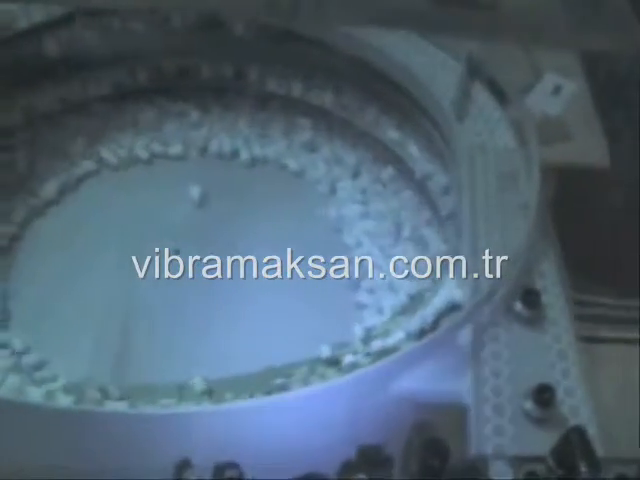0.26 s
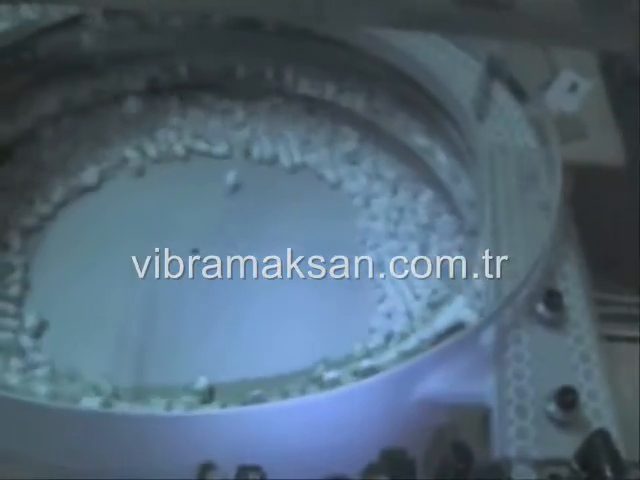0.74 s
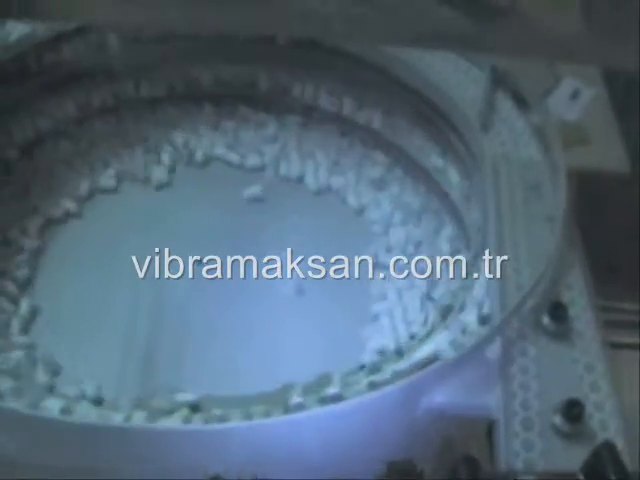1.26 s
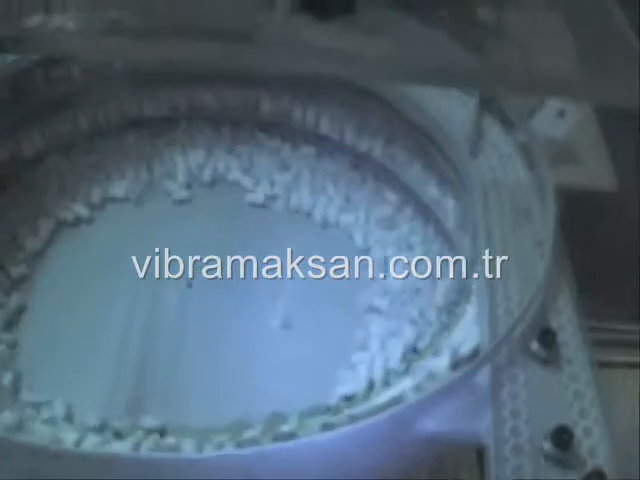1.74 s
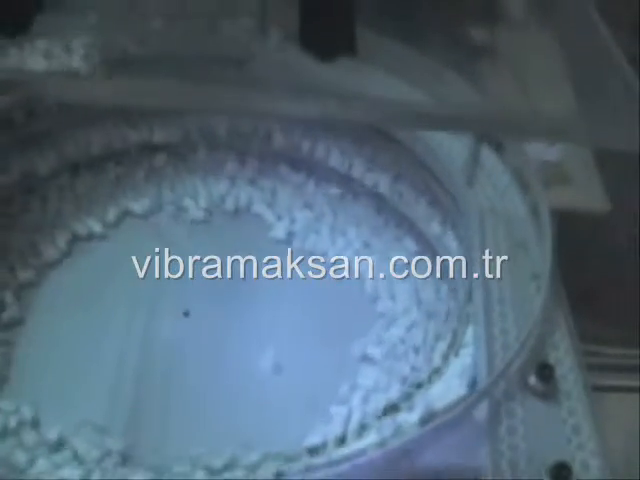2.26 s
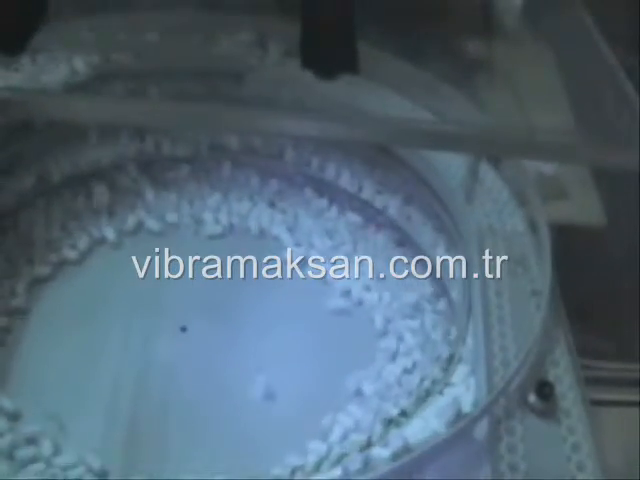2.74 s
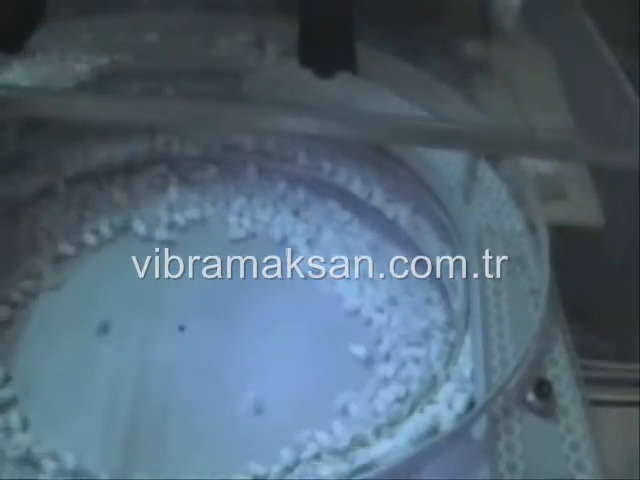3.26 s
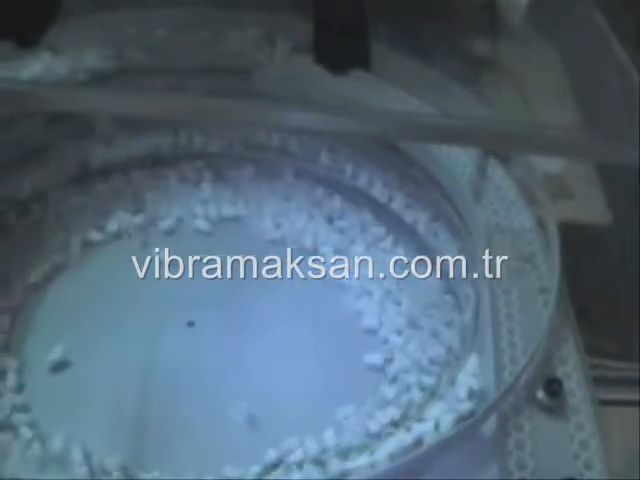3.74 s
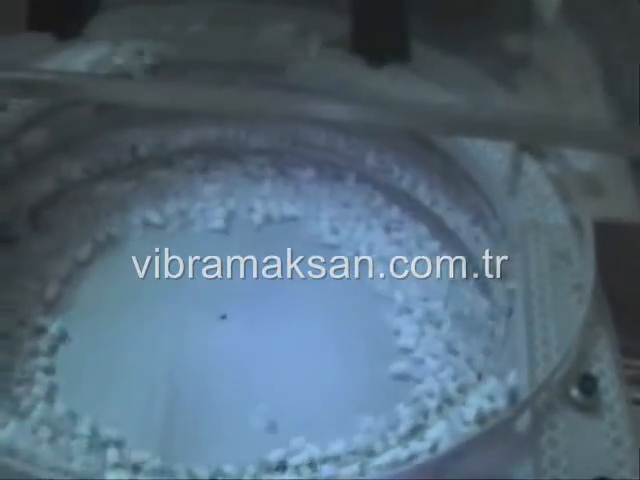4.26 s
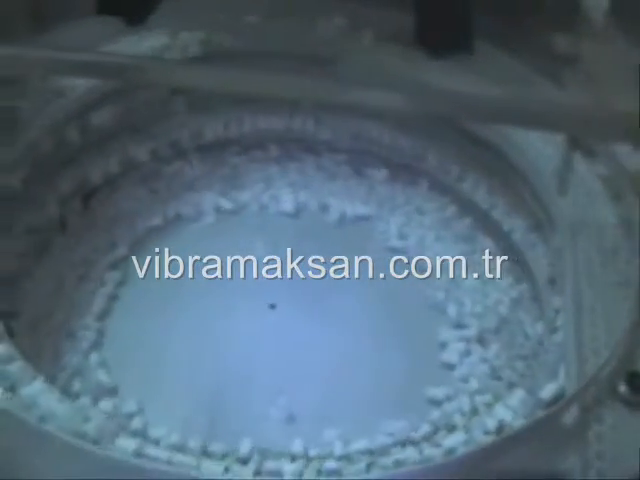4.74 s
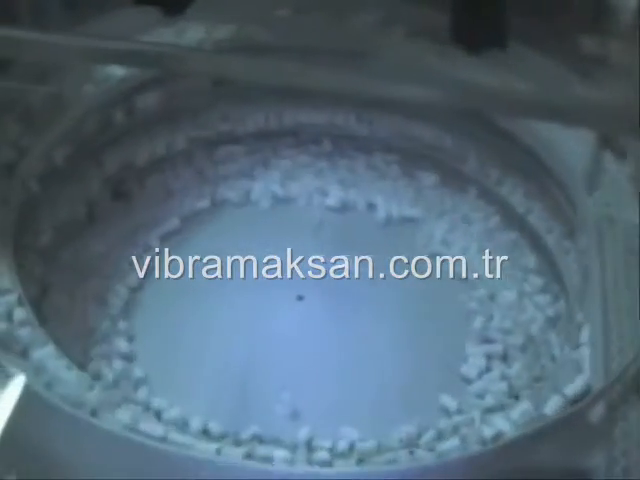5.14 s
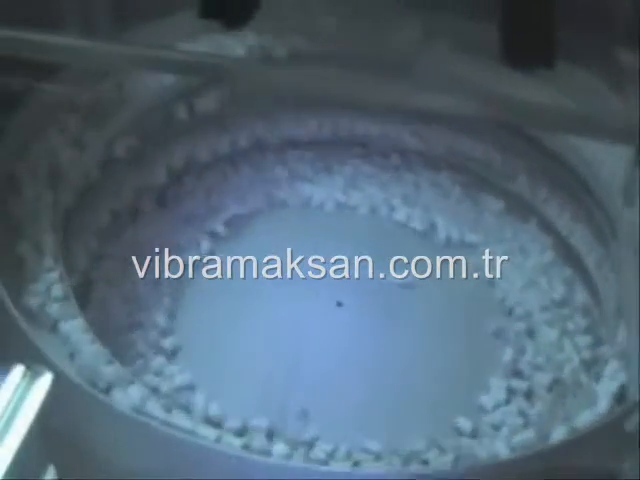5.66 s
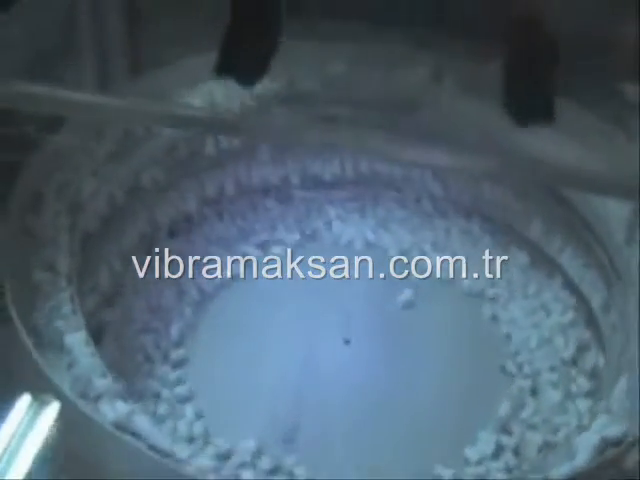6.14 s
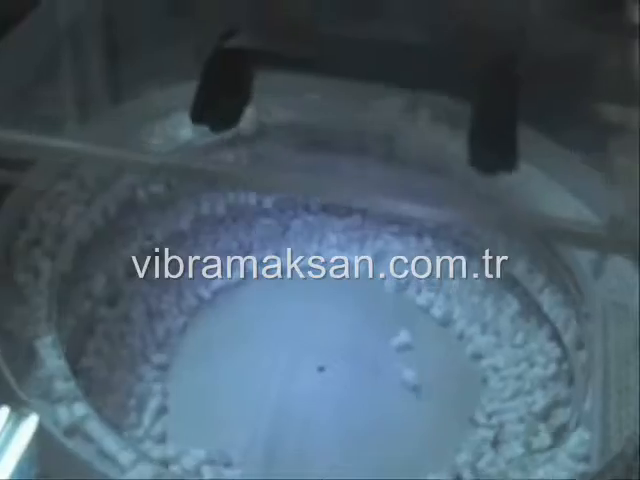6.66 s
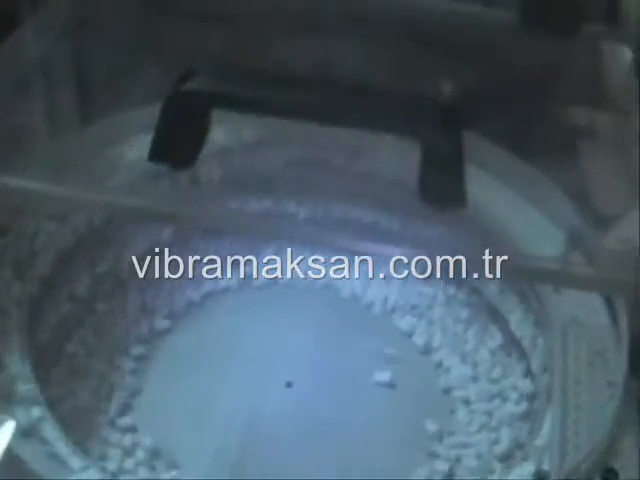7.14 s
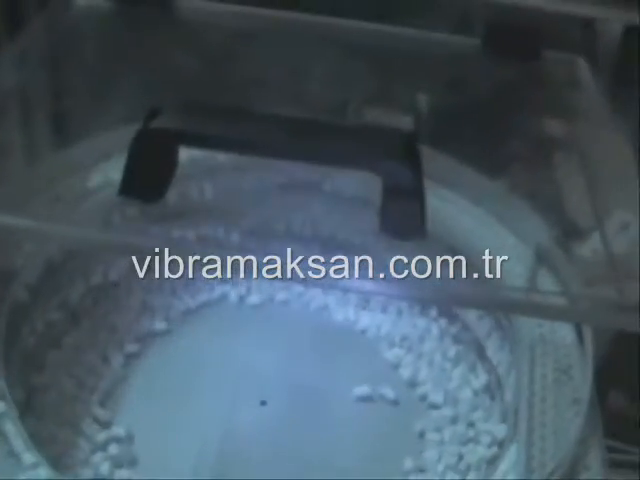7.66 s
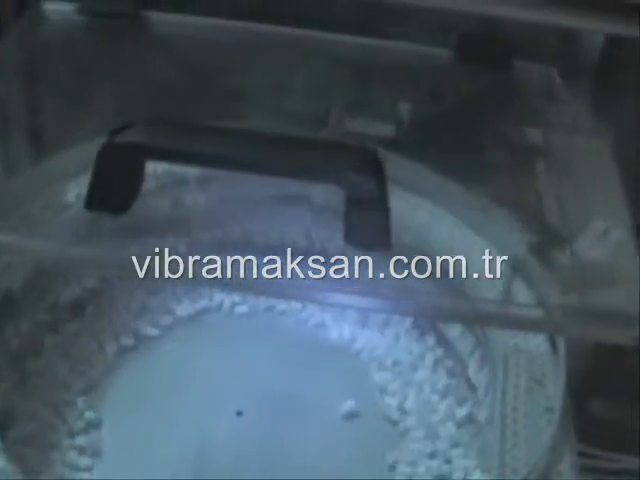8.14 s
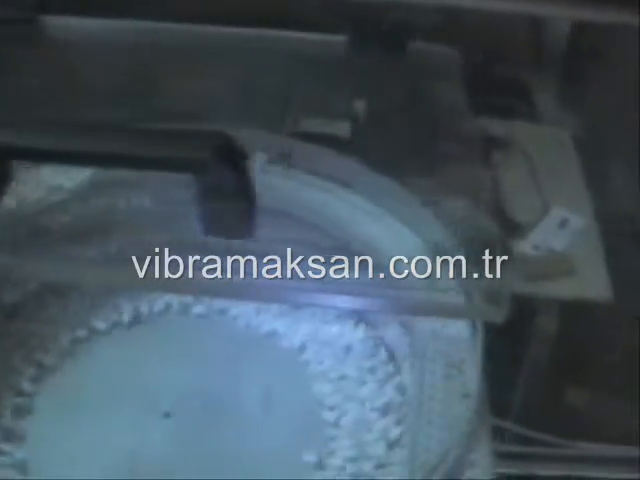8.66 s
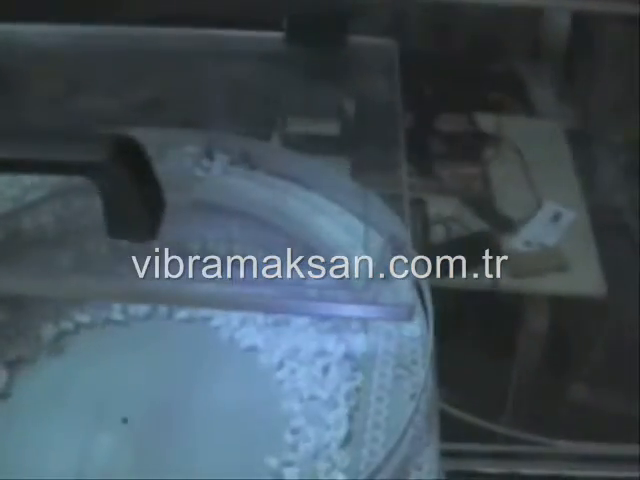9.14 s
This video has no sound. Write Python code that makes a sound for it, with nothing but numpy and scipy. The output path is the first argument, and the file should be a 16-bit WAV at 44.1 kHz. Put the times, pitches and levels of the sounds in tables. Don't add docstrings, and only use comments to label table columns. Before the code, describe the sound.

Close, continuous mains-like buzzing and a harsh, grainy rattle of tiny plastic parts in a metal feeder bowl, with a faint motor humming behind.

```python
import sys
import numpy as np
from scipy import signal
from scipy.fft import rfft, irfft, next_fast_len
from scipy.io import wavfile
from scipy.ndimage import uniform_filter1d, map_coordinates

SR = 44100
rng = np.random.default_rng(int(sys.argv[2]) if len(sys.argv) > 2 else 0)


def undo_db(level):
    steps = np.asarray(level, float) / 20
    return 10 ** steps


def bounce(signal):
    frames = np.transpose(np.atleast_2d(signal))
    limited = np.clip(frames, -1, 1)
    pcm = np.round(limited * 32767).astype(np.int16)
    wavfile.write(sys.argv[1], SR, pcm)


N = 414540

MAINS_HZ = 50.006
TRAVEL_S = .00648
TOP_HZ = 12410
TURN_S, TURN_TAKES_S = 9, .4

# (level [dB], drift while backing away [dB])
BUZZ_LINES = [(-46.5, 1.5), (-42.5, 0), (-42.5, -0.5), (-43.5, 1), (-32.5, -1.5), (-31.5, -3.5),
              (-31, -3.5), (-36, -4), (-25, -0.5), (-35.5, -3), (-42, -2), (-25, -1.5), (-48, -3),
              (-35.5, 1), (-40, -6), (-48, -6), (-41, -2), (-57, 3), (-42.5, 2), (-49.5, -10), (-44, 0),
              (-55, -3)]
# (frequency [Hz], width [Hz], turn [rad])
SPRING_MODES = [(413.4, 80, 5.84), (642, 8.5, -.86), (899, 56, 3.47)]
SWING_CHANGE = {6: -2.4, 8: -1.7, 12: 3, 13: -3.3, 14: 10, 16: 3}
# (frequency [Hz], level of each line [dB])
PLATE_COLOUR = [(1150, -51), (1450, -46.5), (1600, -56), (1800, -49), (2100, -47), (2300, -55.5),
                (4500, -57), (7000, -56)]
# (frequency [Hz], density [dB per Hz])
KNOCK_COLOUR = [(30, -22), (52, -21), (75, -21), (125, -20), (200, -11), (300, -8), (430, -4), (550, 3),
                (650, -4.5), (950, -6.5), (1400, -3), (2930, -2.5), (6100, -2.5), (10200, -6.5),
                (11500, -9.5), (12400, -19.5)]
# (frequency [Hz], width [Hz], level over the knocks [dB])
BOWL_MODES = [(135, 6, -5), (187, 7.4, 1), (560, 7.4, 4), (550, 15, 0.5), (593, 24, 3), (826, 19, 8),
              (1080, 32, 5), (1160, 35, 4.5), (1452, 20, 3), (1670, 50, 2), (1800, 15, 2), (1993, 30, 2.5),
              (2173, 40, 3.5), (2372, 17, 5.5), (2616, 52, 3.5), (2900, 320, -1), (3350, 18, -11),
              (3600, 50, 1.5), (3920, 60, -6.5), (4340, 61, 2), (4870, 360, 1.5), (6100, 460, 2.5),
              (7300, 350, 2), (8860, 100, 3.5), (9900, 270, 1)]
# (from [Hz], to [Hz], rate [hits/s], size scatter [dB], throw [0-1],
# scatter t60 [s], flicker [dB], beaming out of the bowl [ratio])
COLLISIONS = [(0, 2180, 5500, 2.7, 0.025, 0.12, 0.13, 0.11),
              (1890, 4200, 10000, 3.1, 0.063, 0.05, 0.17, .05),
              (3740, 7940, 4400, 1.2, 0.28, 0.051, 0.25, 0.15),
              (7620, 14000, 3000, 1.65, .25, 0.068, 0.21, 1.27)]
# (time [s], crowd [dB], facing [dB])
CROWD_FACING = [(0, 1.5, -1.5), (.3, -0.1, 1.5), (.48, -0.5, 0), (.64, 1, -1), (1.1, .5, -0.2),
                (2.3, .5, 0.7), (2.6, 0.1, 0.5), (3.35, 1, 1), (3.58, -1, 2.5), (4.12, 1.3, 0.5),
                (4.6, 0, 1.7), (5.4, 0.5, 0), (5.65, -0.5, 1.8), (6.2, -0.6, 1.5), (7.45, 0, 1.6),
                (7.85, -1.2, 0.5), (8.5, -1, 1), (9.4, 0.4, -1)]
# (time [s], peak [dB], left minus right [dB])
PART_DROPS = [(0.8384, -11, -1.5), (0.9824, -12, -1.5), (1.0254, -13, -1.0), (1.6094, -14, -1.0),
              (1.7659, -8, -0.5), (2.2657, -8, -1.5), (2.5034, -13, -0.5), (2.5626, -12, -1.0),
              (3.2271, -12, -1.0), (3.4735, -10, -1.0), (3.8034, -10, -1.0), (3.9164, -12, -1.0),
              (4.3194, -13, -1.0), (4.7571, -10, -1.5), (5.6286, -11, -2.5), (6.9197, -8, -1.5),
              (7.0918, -10, -2.0), (7.6316, -12, -2.5), (9.2234, -16, -1.0)]
# (frequency [Hz], level [dB], waver [Hz])
MOTOR_LINES = [(98.26, -55, .003), (228.43, -38.3, .03), (456.86, -50, .1), (685.3, -45, .3),
               (865.6, -43, .4), (913.7, -52, .3)]
# (from [s], to [s], frequency [Hz], width [Hz], level [dB])
STANDING_WAVES = [(1.5, 5.5, 1700, 140, 3), (4.5, 11, 1420, 200, 3), (-1, 7.6, 1230, 110, -1),
                  (7.5, 9.6, 910, 190, -4), (4, 4.8, 8800, 500, 1.5), (10, 9.6, 9900, 300, 3),
                  (8, 9.1, 6500, 400, 4), (.55, 1.2, 4300, 140, 4.5), (9, 8.7, 2600, 900, 2),
                  (8.7, 9.6, 2700, 400, -1.5)]
# (frequency [Hz], side minus mid [dB])
SIDE_LEVEL = [(60, -2), (110, -5), (190, -12.5), (350, -13.5), (630, -12.5), (1140, -14), (2060, -12),
              (3710, -10), (6680, -11.5), (12000, -4.5)]
# (frequency [Hz], left minus right [dB])
PORT_TILT = [(190, 0.0), (350, 0.5), (630, 0.5), (1140, 0.0), (6680, 0.0), (12000, -2.0)]


def curve(table, hz):
    f, db = np.transpose(table)
    return np.interp(np.log(hz + 1), np.log(f), db)


def shape(x, gain):
    size = next_fast_len(N)
    hz = np.arange(size // 2 + 1) * SR / size
    return irfft(rfft(x, size) * gain(hz), size)[..., :N]


def unit(x):
    return x / np.sqrt(np.mean(x ** 2))


def walk(rate):
    hold, size = int(SR / rate), 32
    held = np.repeat(rng.standard_normal(N // hold + 1), size)
    slewed = uniform_filter1d(uniform_filter1d(held, size), size)
    return unit(np.interp(np.arange(N) * size / hold, np.arange(len(held)), slewed))


def tail(t60):
    fade = np.exp(-2 * np.log(1000) * np.arange(int(t60 * SR)) / SR / t60)
    return fade / fade.sum()


def over_time(table):
    s, *columns = np.transpose(table)
    return [np.interp(np.arange(N) / SR, s, column) for column in columns]


def buzz(t, waver_db=0.56):
    turned = np.clip((t - TURN_S) / TURN_TAKES_S + .5, 0, 1)
    out = 0
    for k, (db, drift_db) in enumerate(BUZZ_LINES, 2):
        hz = k * MAINS_HZ
        place_db = drift_db * (t / t[-1] - .5) + SWING_CHANGE.get(k, 0) * turned
        level_db = db + place_db + waver_db * walk(2.05)
        held = sum(turn * np.arctan((hz - f) / width) for f, width, turn in SPRING_MODES) - 2.12
        out = out + undo_db(level_db) * np.sqrt(2) * np.cos(2 * np.pi * hz * (t - TRAVEL_S) - held)
    return out


def clatter(t, uneven_db=2, count=3):
    k = np.arange(24, 141)
    cycle = (MAINS_HZ * t % 1) * 8192
    size = undo_db(curve(PLATE_COLOUR, k * MAINS_HZ) + uneven_db * rng.standard_normal(len(k)))
    out = 0
    for n in range(count):
        lines = np.zeros(4097, complex)
        lines[k] = size * np.exp(2j * np.pi * rng.random(len(k)))
        pattern = irfft(lines) * 4096 * np.sqrt(2)
        share = np.cos(np.pi / 2 * np.clip(t / t[-1] * (count - 1) - n, -1, 1))
        out = out + share * np.interp(cycle, np.arange(8192), pattern, period=8192)
    return out


def knocks(t, rate, scatter_db, throw, t60):
    density = rate / SR * (1 + throw * np.cos(2 * np.pi * MAINS_HZ * (t - .004)))
    hits = rng.random(N) < density
    power = hits * undo_db(2 * scatter_db * np.minimum(rng.exponential(size=N), 4.5))
    scattered = np.sqrt(np.abs(signal.oaconvolve(power, tail(t60))[:N]))
    return unit(scattered * rng.standard_normal((2, N)))


def ringing(hz):
    modes = sum((undo_db(db) ** 2 - 1) / (1 + (2 * (hz - f) / width) ** 2) for f, width, db in BOWL_MODES)
    return undo_db(curve(KNOCK_COLOUR, hz)) * np.sqrt(np.clip(1 + modes, .05, None))


def rattle(t):
    jostle = walk(14)
    crowd_db, facing_db = over_time(CROWD_FACING)
    out = 0
    for lo_hz, hi_hz, rate, scatter_db, throw, t60, flicker_db, beaming in COLLISIONS:
        def band(hz):
            return ringing(hz) / np.sqrt((1 + (lo_hz / (hz + 1)) ** 8) * (1 + (hz / hi_hz) ** 8))
        heard = shape(knocks(t, rate, scatter_db, throw, t60), band)
        flicker = flicker_db * (jostle + 0.73 * walk(25))
        out = out + heard * undo_db(crowd_db + beaming * facing_db + flicker)
    return out * undo_db(-16) / np.std(out[0])


def drops(trim_db=-0.5, t60=.04):
    out, fade = np.zeros((2, N + SR)), tail(t60)
    for s, db, pan_db in PART_DROPS:
        for lag_s in (0, .004):
            hit = undo_db(db + trim_db) * np.sqrt(fade / fade[0]) * rng.standard_normal(len(fade))
            i = int((s + lag_s) * SR)
            out[:, i:i + len(hit)] += hit * np.array([[1], [np.tanh(pan_db / 17)]])

    def thin(hz):
        return hz ** 2 / (hz ** 2 + 5500 ** 2) / np.sqrt(1 + (hz / 11800) ** 12)
    return shape(out[:, :N], thin)


def motor(t):
    load = np.cumsum(walk(1.505)) / SR
    return sum(undo_db(db) * np.sqrt(2) * np.cos(2 * np.pi * (hz * t + waver * load))
               for hz, db, waver in MOTOR_LINES)


def standing(x, edge_s=.3):
    hz, s, cells = signal.stft(x, SR, nperseg=2048)
    lift_db = 0
    for t0, t1, f, width, db in STANDING_WAVES:
        present = np.clip(np.minimum(s - t0, t1 - s) / edge_s + .5, 0, 1)
        lift_db = lift_db + db * np.outer(np.exp(-(2 * (hz - f) / width) ** 2), present)
    return signal.istft(cells * undo_db(lift_db), SR, nperseg=2048)[1][..., :N]


def patches(x, depth_db, hold_s, width_hz):
    hz, s, cells = signal.stft(x, SR, nperseg=512)
    chance = rng.standard_normal((200, 400))
    where = np.meshgrid(hz / width_hz, s / hold_s, indexing="ij")
    field = map_coordinates(chance, where, order=3, mode="mirror")
    return signal.istft(cells * undo_db(depth_db * field), SR, nperseg=512)[1][..., :N]


def scene():
    t = np.arange(N) / SR
    shifting = patches(standing(rattle(t)), depth_db=.45, hold_s=1.1, width_hz=300)
    mid, side = patches(shifting, depth_db=0.4, hold_s=.07, width_hz=608)
    side = shape(side, lambda hz: undo_db(curve(SIDE_LEVEL, hz) + 2.0))
    fall_mid, fall_side = drops()
    mid = mid + fall_mid + buzz(t) + clatter(t) + motor(t + 0.00161)
    side = side + fall_side
    return np.array([mid + side, mid - side])


def band_limit(x):
    return signal.sosfilt(signal.butter(12, 12640, fs=SR, output="sos"), x)


def record(dry):
    def port_gain(hz):
        return undo_db(np.outer([.5, -.5], curve(PORT_TILT, hz))) / (1 + (hz / TOP_HZ) ** 600)
    rounded = np.tanh(.6 * dry) / .6
    return band_limit(shape(rounded, port_gain))


dry = scene()
out = record(dry)
bounce(out)
```